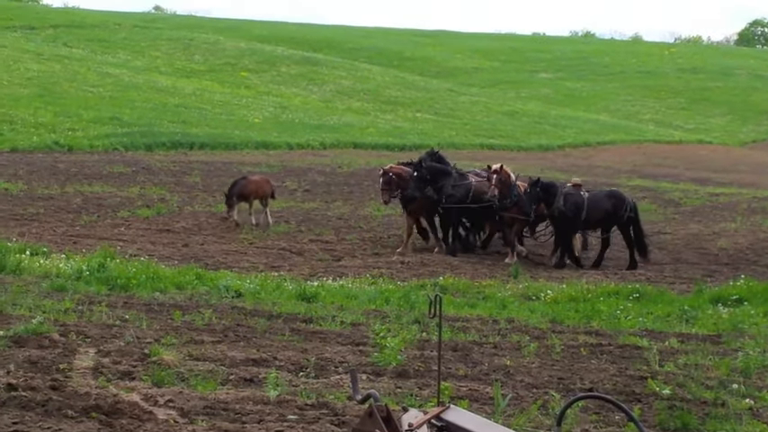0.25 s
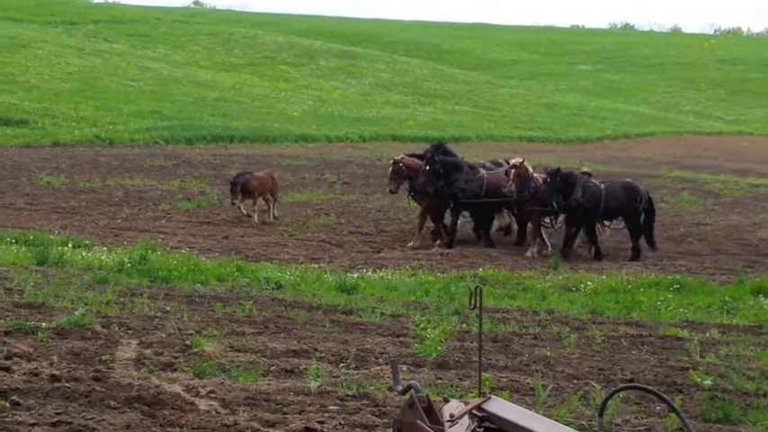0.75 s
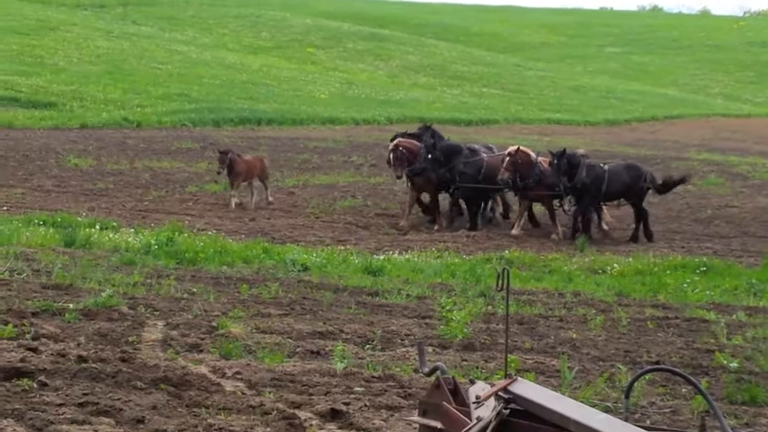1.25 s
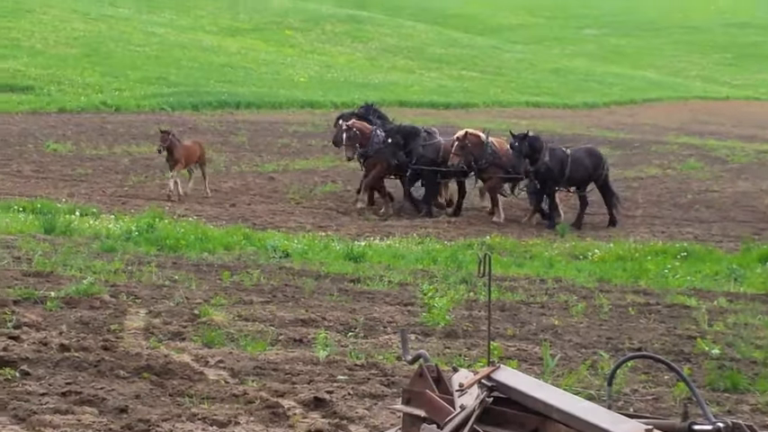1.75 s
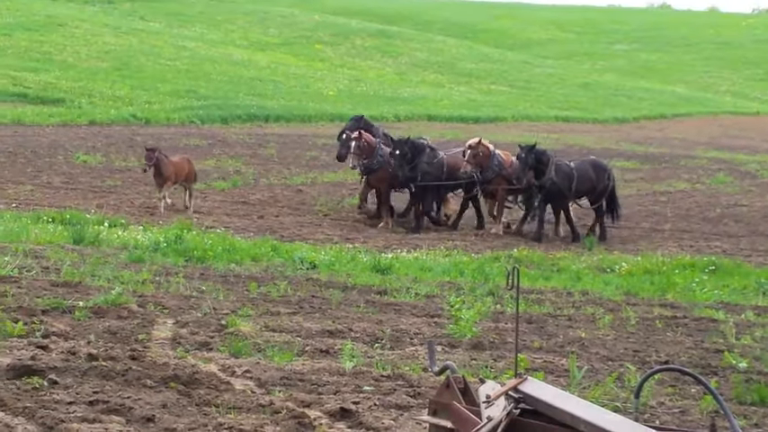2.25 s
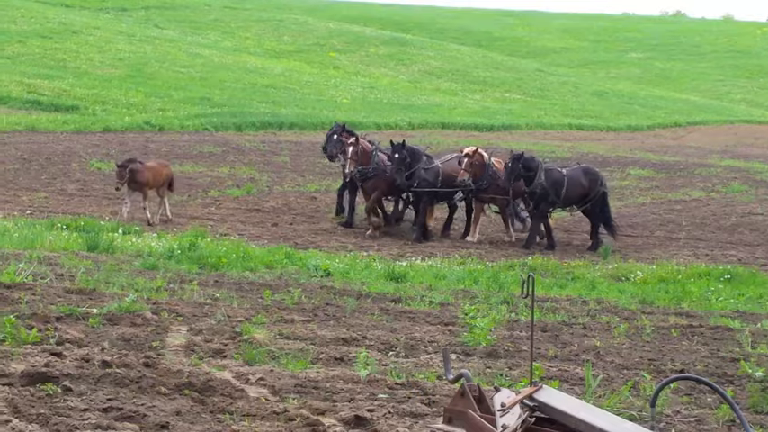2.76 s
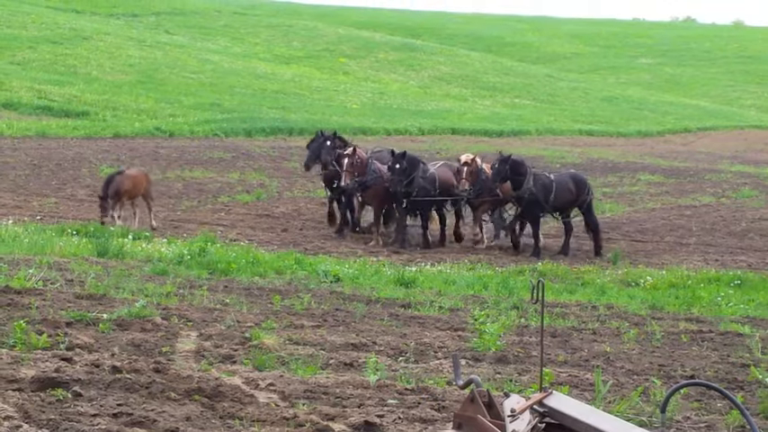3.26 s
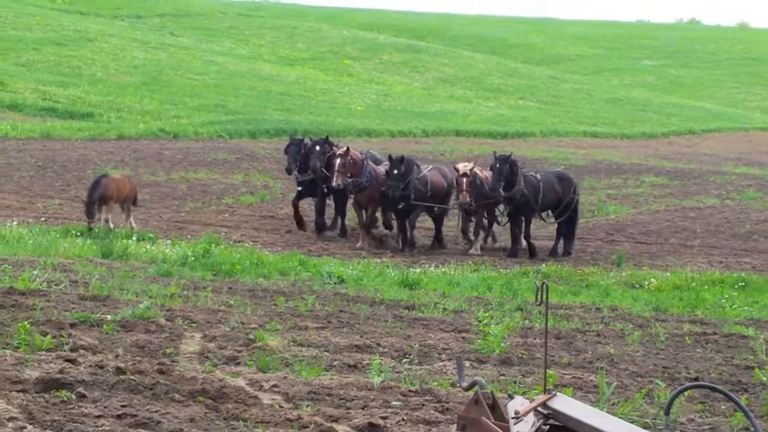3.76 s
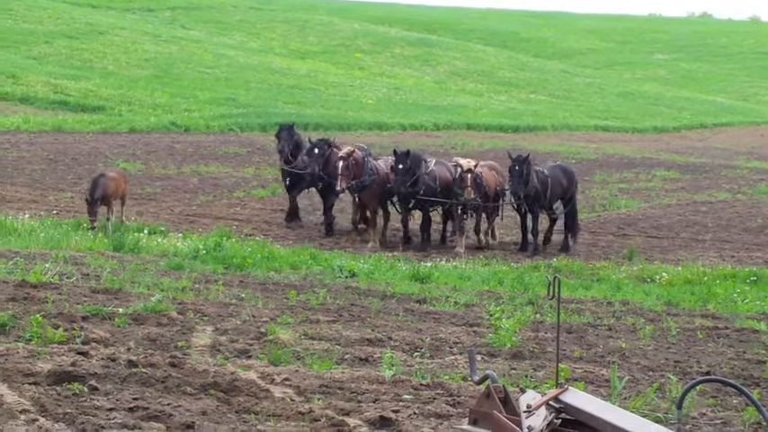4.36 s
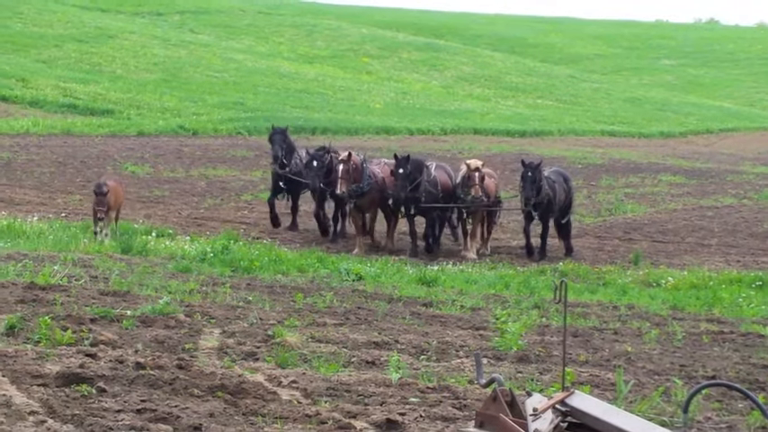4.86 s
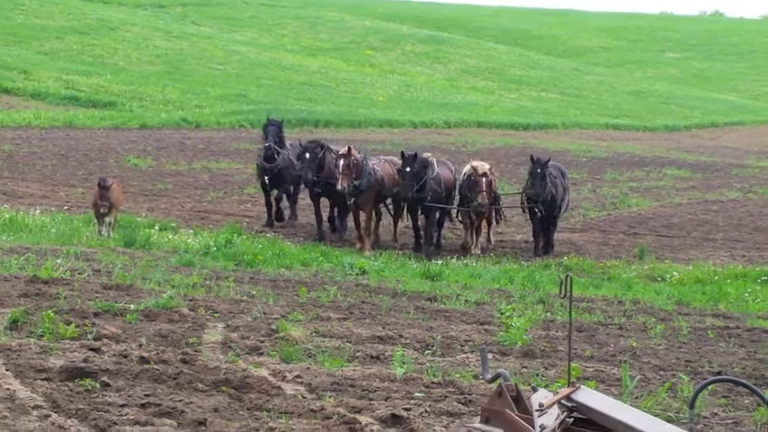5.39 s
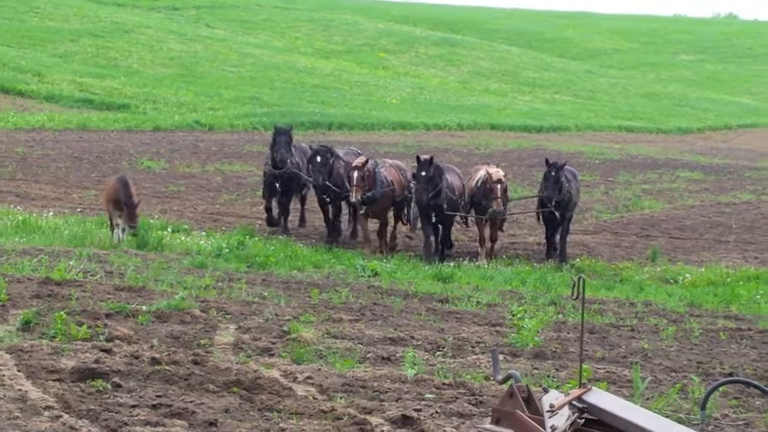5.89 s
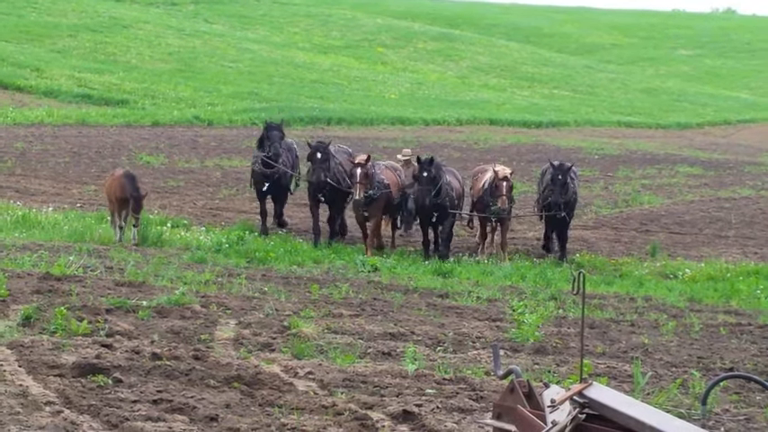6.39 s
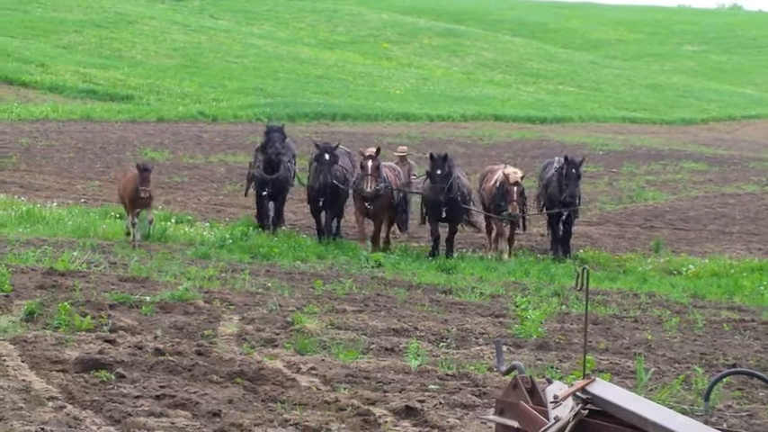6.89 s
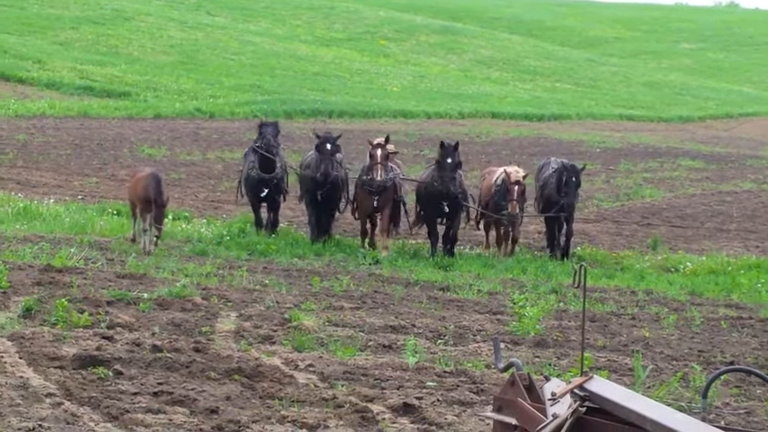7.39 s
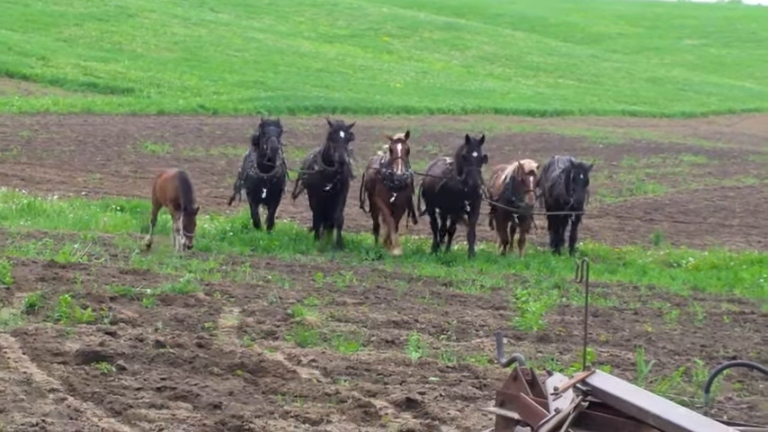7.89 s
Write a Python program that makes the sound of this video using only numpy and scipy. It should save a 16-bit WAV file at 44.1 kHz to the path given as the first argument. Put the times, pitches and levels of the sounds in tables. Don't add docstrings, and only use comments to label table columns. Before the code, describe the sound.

A team of harnessed horses comes nearer across tilled soil. Their chains start as a distant thin rustle, then rattle in uneven surges, with crisp ticks, tiny plinks and occasional muffled yoke or hoof knocks. Field birds whistle in the background over soft wind, slight hiss and wavering far engines. The last second is loudest, with a ringing iron clank; dry open-air sound, wide bright stereo.

```python
import sys
import numpy as np
from scipy import signal
from scipy.io import wavfile
from scipy.ndimage import uniform_filter1d

SR = 44100
rng = np.random.default_rng(int(sys.argv[2]) if len(sys.argv) > 2 else 0)


def boost(x):
    u = np.asarray(x, float) / 20
    return 10 ** u


def inscribe(sig):
    pcm = np.round(np.clip(np.atleast_2d(sig).T, -1, 1) * 32767)
    wavfile.write(sys.argv[1], SR, pcm.astype(np.int16))


N = 358885

# (t/s, level/dB)
NEAR = [
    (0.0, -74),
    (0.6, -100),
    (0.7, -67.5),
    (4.4, -70),
    (5.3, -57.5),
    (6.9, -56),
    (8.14, -53.5),
]
# (t/s, level/dB)
JOLTS = [(.69, -70), (1.0, -77), (1.28, -77), (1.53, -58), (1.7, -64), (1.97, -62.5), (2.42, -62),
         (2.74, -62), (3.12, -77), (3.4, -61), (3.76, -69), (4.14, -60.5), (4.5, -59.5), (4.8, -59.5),
         (4.96, -71), (5.16, -63), (5.48, -58), (5.74, -57), (5.88, -68), (6.05, -60.5), (6.4, -61),
         (6.6, -56.5), (6.79, -91), (7.02, -52), (7.401, -45.5), (7.722, -41.5), (7.86, -49.5),
         (7.97, -46.5)]
# (f/Hz, level/dB)
LINKS = [(5110, -10), (5560, -12), (9700, -11), (10000, -1), (10150, -5), (11000, -15)]
# (t/s, peak level of the tick/dB, level of the low
# knock/dB)
SNAPS = [(1.9686, -23.5, -50.5), (2.397, -39.5, -56), (2.696, -32.5, -53), (3.408, -37.5, -58),
         (4.103, -36.5, -60), (4.4804, -34, -49), (4.5425, -22.5, -49), (4.79, -25.5, -58),
         (5.159, -31, -67), (5.472, -32, -52), (5.4945, -29.5, -38.5), (5.7056, -35, -52),
         (5.778, -28, -48.5), (6.029, -26.5, -66), (6.3007, -31.5, -53), (6.3527, -23.5, -47),
         (6.6115, -22, -49.5), (6.648, -33.5, -64), (6.788, -29, -45), (6.9626, -32.5, -51),
         (7.2645, -22.5, -43.5), (7.5878, -30, -59), (7.928, -28, -39.5), (7.9373, -26.5, -41),
         (7.9945, -27, -36.5), (8.1294, -25, -71),
         (7.672, -30, -55),
    (7.7035, -25, -38),
]
# (t/s, peak level of the tick/dB)
TAPS = [(0.44, -48), (0.6654, -53), (0.716, -40), (0.837, -43.5), (1.443, -42), (1.5864, -41.5),
        (2.599, -43.5), (3.378, -46), (4.1757, -35.5), (4.45, -38), (4.743, -42), (5.3697, -36.5),
        (5.533, -38), (6.482, -36.5), (7.634, -34), (1.511, -42), (1.8652, -49), (2.1989, -50),
        (2.3743, -50), (2.4206, -56), (2.467, -40), (2.753, -41), (3.415, -42), (3.5068, -42),
        (4.114, -42.5), (4.295, -42), (4.431, -41.5), (4.5765, -42), (4.982, -39), (5.3853, -41),
        (5.5555, -36), (5.904, -36), (5.98, -43), (6.044, -41), (6.0815, -35.5), (6.4026, -38),
        (6.5772, -37), (6.6, -37.5), (6.7338, -43), (6.766, -34), (6.866, -38), (6.8969, -38), (7.035, -38),
        (7.3097, -37), (7.319, -37), (7.3902, -44), (7.421, -29), (7.4828, -32), (7.534, -32), (7.819, -32),
        (7.8246, -33), (7.8967, -33), (8.0478, -48), (4.798, -30.5), (4.886, -43), (5.72, -37),
        (5.865, -42), (1.781, -47), (1.88, -46), (7.23, -32)]
# (t/s, level of the low knock/dB)
THUDS = [
    (1.99, -45),
    (4.7596, -52.5),
    (5.816, -46),
    (7.104, -48.5),
    (7.71, -33),
    (7.232, -45.5),
    (7.875, -45),
    (8.083, -61),
]
# (t/s, length/s, f/Hz, level/dB)
CHIMES = [(0.618, 0.05, 8060, -55.5), (0.663, 0.035, 7840, -49), (.68, 0.076, 8310, -60),
          (0.729, 0.054, 7750, -59), (0.667, 0.024, 5420, -66), (1.59, .015, 6370, -56),
          (1.665, .03, 6360, -55.5), (1.66, 0.082, 4000, -63), (3.072, .08, 5540, -63),
          (3.8, .035, 8100, -56), (6.49, 0.045, 4990, -52), (6.69, .09, 5120, -58),
          (7.238, 0.035, 4320, -56), (7.282, 0.03, 4700, -53), (7.754, 0.02, 3190, -40.5),
          (7.752, .024, 7390, -46), (7.932, 0.037, 9200, -36.5), (7.973, 0.042, 5110, -50),
          (5.687, .1, 7050, -55), (6.04, 0.051, 3200, -55), (1.987, 0.031, 13260, -56),
          (1.99, 0.0024, 2600, -40), (2.426, 0.018, 5570, -54.5), (2.429, 0.11, 5070, -58),
          (2.692, 0.097, 7860, -50), (2.74, .02, 6200, -49), (3.151, 0.054, 9580, -56.5),
          (2.925, 0.024, 6900, -56), (3.376, 0.036, 8570, -49), (3.757, 0.02, 8460, -50.5),
          (4.75, 0.022, 6480, -55), (4.796, 0.083, 13300, -50), (5.864, 0.036, 7800, -45),
          (6.047, 0.02, 4790, -49), (6.256, 0.037, 5550, -46), (6.261, 0.045, 3890, -54),
          (6.487, 0.054, 9700, -44), (7.334, 0.28, 10140, -44), (7.369, 0.05, 5070, -47.5),
          (7.446, 0.2, 11040, -40.5), (7.395, 0.13, 9800, -42), (7.541, 0.053, 10470, -47),
          (7.55, 0.1, 5140, -54.5), (7.587, 0.05, 10820, -45.5), (7.84, 0.036, 11000, -54),
          (7.895, 0.018, 5560, -40), (7.997, 0.022, 13600, -45), (8.089, 0.02, 5070, -50),
          (7.7096, 0.00035, 2800, -13), (7.753, .009, 2550, -41), (7.738, 0.011, 1930, -32.5),
           (7.775, .04, 2550, -52), (7.035, .045, 1950, -47.5), (7.4, 0.044, 1950, -47),
           (6.752, 0.054, 2900, -51), (5.65, .06, 10150, -52.5), (5.28, .045, 7850, -60),
           (6.035, .05, 6000, -54), (6.255, 0.06, 10000, -52.5), (6.26, .05, 5100, -60),
           (1.715, .015, 7800, -58), (1.3, .03, 5500, -66), (1.845, .025, 5520, -62),
           (1.995, .03, 5120, -63), (8.3, .04, 6500, -50), (5.5, .06, 5560, -57), (7.035, .03, 8350, -50),
           (7.945, 0.055, 3500, -46), (5.38, .05, 6550, -53), (5.5, .04, 6650, -58),
           (5.477, .01, 6500, -49), (7.385, .015, 6800, -46), (5.895, 0.033, 10000, -59),
           (4.835, .085, 10000, -54)]
# (t/s, peak level/dB, f/Hz)
PLINKS = [(1.958, -51, 3970), (1.968, -47, 3500), (2.398, -47, 4520), (4.76, -49, 3140), (5.259, -49, 2400),
          (5.719, -46.5, 2330), (5.781, -44, 3240), (5.914, -45, 4880), (5.942, -53, 1900),
          (6.082, -44, 3960), (6.205, -49, 1750), (6.211, -51, 4200), (6.402, -51, 4500),
          (6.505, -46, 4100), (6.516, -45, 4230), (6.575, -47, 4100), (6.727, -51, 2410), (6.84, -48, 4100),
          (6.927, -44, 2340), (7.126, -43, 2500), (7.231, -43, 3170), (7.241, -47, 2300),
          (7.264, -36, 4220), (7.379, -47, 2990), (7.534, -44, 4170), (7.64, -46, 3200), (7.818, -40, 2960),
          (7.909, -40, 2000), (8.084, -47, 4170)]
# (t/s, length/s, level/dB)
LOOSE = [
    (1.863, 0.013, -50.5),
    (2.43, 0.1, -53.5),
    (4.623, 0.032, -51.5),
    (4.793, 0.028, -38.5),
    (6.136, 0.011, -48.5),
    (6.595, 0.042, -48.5),
    (7.04, 0.08, -45),
    (7.973, 0.053, -41.5),
    (8.085, 0.037, -41),
]
# (length/s, f/Hz, level/dB)
BUCKLE = [
    (0.085, 4418, -39),
    (.13, 4931, -52),
    (0.11, 5126, -43),
    (0.12, 9695, -44),
    (0.05, 10425, -51),
    (0.06, 12451, -47),
]
# (f/Hz, level/dB, time to fall 60 dB/s)
CLEVIS = [(1380, -19, .8), (1914, -11.5, .2), (1950, -19, .3), (2380, -13, .5), (2548, 1.5, .6),
          (2684, -15, .3), (3020, -19, .17), (3190, 1, .125), (3926, -15, .15), (4753, -27, .3),
          (5566, -27, .3), (6471, -31, .15), (7400, -15, .6), (8360, -26, .12)]
# (t/s, level/dB, time until gripped again/s, tilt/dB per octave)
CLANKS = [(1.502, -65.5, 0.039, -19), (4.098, -63, 0.011, -22), (4.544, -56.5, 0.11, -2),
          (5.475, -50.5, 0.011, -25), (5.49, -44.5, 0.014, -18), (5.711, -56.5, 0.039, -20.5),
          (6.765, -52.5, 0.029, -19), (6.983, -43.5, 0.026, -13.5), (7.032, -47.5, 0.032, -12),
          (7.393, -46.5, 0.045, -11), (7.709, -17.5, 0.038, 3), (7.877, -49.5, 0.059, -17),
          (7.927, -49, 0.049, -25.5), (7.98, -41, 0.03, -9)]

# (t/s, length/s, f/Hz, level/dB)
FLATS = [(0.211, 0.03, 1515, -71), (0.076, 0.028, 3350, -74), (0.487, 0.028, 1425, -74),
         (0.842, 0.078, 2075, -64), (1.294, 0.083, 2080, -66), (0.698, 0.064, 2100, -65),
         (.85, 0.031, 2850, -68.5), (1.438, 0.13, 2000, -68.5), (4.108, 0.06, 1963, -65),
         (4.519, 0.1, 1930, -65), (4.954, 0.052, 3260, -58)]
SWOOPS = [(.61, 0.0456, 2670, -76), (.75, 0.034, 2210, -67), (1.0, .055, 1600, -73),
          (1.36, 0.043, 2820, -67), (4.45, .09, 1700, -63), (5.04, 0.077, 2720, -67)]
DIVES = [(.105, .06, 2900, -72), (.705, .03, 2800, -66), (.8, .035, 2200, -70), (.94, .035, 2500, -69),
         (1.245, .042, 1790, -72), (1.89, .02, 2020, -65), (.915, .02, 1700, -69)]
HILLS = [(5.055, 0.21, 3106, -62)]
DROOPS = [(0.2, .075, 3320, -75), (.96, 0.062, 7800, -65), (1.026, 0.057, 7150, -67),
          (1.31, 0.042, 7250, -59.5)]
SAGS = [(1.19, 0.18, 7600, -58), (1.06, 0.052, 6180, -63), (1.345, 0.065, 6270, -62),
        (6.185, .085, 2285, -56), (6.335, 0.09, 2308, -55), (6.48, 0.09, 2317, -54)]
CHIPS = [(4.485, 0.04, 4200, -54), (4.575, .042, 4130, -53), (4.688, 0.045, 4250, -57),
         (4.905, 0.048, 4150, -57), (5.12, 0.06, 4300, -55), (5.33, .045, 4100, -58)]
ARCHES = [(1.635, .08, 3020, -66), (1.735, .07, 3200, -61), (1.85, .06, 2850, -65), (.84, .05, 2900, -68),
          (2.04, .06, 3200, -70)]
# (delay t/s, length/s, start f/Hz, middle f/Hz, end f/Hz, level/dB)
PIPE = [
    (0, .05, 3410, 4140, 4240, -3),
    (0.1, .036, 3585, 4160, 4700, -1),
    (0.209, .073, 4860, 4900, 4895, -7.5),
    (.268, .059, 4935, 4240, 3805, 0),
]
SLUR = [
    (0, .067, 1490, 1670, 1930, -13.5),
    (.055, 0.028, 2470, 2955, 3200, -0.5),
]
# (t/s, level/dB)
PIPES = [(2.985, -65), (3.485, -55), (3.98, -54.5)]
SLURS = [(.26, -66), (.62, -59.5), (1.001, -63.5)]
# (delay t/s, length/s, start f/Hz, middle f/Hz, end f/Hz, level/dB)
FALLING = [
    (0, .06, 6600, 6000, 5750, -56),
    (.05, .035, 7600, 6800, 5600, -54),
    (.075, .055, 5000, 4800, 4100, -57),
]
RISING = [
    (0, .035, 4000, 4500, 5000, -58),
    (.035, .06, 5600, 6500, 7300, -52),
]
FALLING_S = [4.895, 5.095, 5.295]
RISING_S = [5.505, 5.645, 5.775]

# (t/s, level/dB)
DRONE = [(0, -78), (.4, -66.5), (.85, -69.5), (1.6, -57), (2.8, -59.5), (3.1, -63.5), (3.7, -58.5),
         (4.15, -69), (4.55, -64.5), (5.0, -52), (5.4, -49.5), (6.5, -54.5), (7.0, -63.5), (7.4, -53.5),
         (8.14, -55.5)]
DOUBLE_S = [.1, .8, 1.85, 3.5, 4.1, 4.5, 5.3, 5.8, 6.2, 7.07, 7.8]
TRIPLE_S = [.42, 1.15, 2.03, 2.5, 2.72, 3.25, 3.95, 4.65, 5.9, 6.7, 7.05, 7.75]
FOURTH_S = [1.45, 1.75, 2.75, 3.72, 4.15, 5.9, 6.25, 6.75, 7.9]
# (t/s, level/dB)
AIR_DB = [
    (0.0, -68.5),
    (0.04, -72.5),
    (8.14, -62),
]
# (f/Hz, level/dB per Hz)
AIR = [(20, -10), (45, -1), (100, 7.5), (160, 9), (300, 5), (520, 0), (700, 5), (1150, -0.5), (2600, -3),
       (5000, -17.5), (12000, -18.5)]
# (f/Hz, likeness from 0 to 1)
SAME = [(60, 1), (130, 0.7), (290, 0.86), (640, 0.32), (1400, 0), (5000, 0.78)]
# (f/Hz, left level/dB, right level/dB)
PORTS = [(60, -2.5, 1), (1270, -5, -1.5), (2600, -2.5, 4), (3550, -0.5, 6), (4860, 3.5, 8),
         (5700, 13.5, -4.5), (6480, 12.5, 14.5), (7020, -23, 17.5), (7440, 12, 21), (7960, -10, 21.5),
         (9700, -12, 12.5), (11500, 1.5, 3), (13500, -43, 7.5), (14800, -27, 7)]


def rattle():
    motion_db = shake()
    treble = grains(motion_db - 11, 4320, 13980, per_s=6000, spread_db=3.2, t60=0.0072)
    clatter = grains(motion_db - 7, 1347, 4625, per_s=2500, spread_db=3.6, t60=0.024)
    faint = np.zeros(N)
    for at, which, size, length in rng.random((500, 4)):
        hz, db = LINKS[int(which * len(LINKS))]
        level_db = motion_db[int(at * N)] + db - 11 + 10 * size
        tone = ring(hz * (1 + .008 * length), .008 + .03 * length, .2)
        add(faint, at * N / SR, at_source(level_db, hz) * tone)
    return treble + clatter + scatter(faint, .12, 3)


def shake():
    rise_s, fall_s = 0.032, 0.078
    t = np.arange(0, N, 64) / SR
    surges = np.zeros(len(t))
    for s, db in JOLTS:
        surges += boost(db) * np.exp(np.minimum((t - s) / rise_s, (s - t) / fall_s))
    return 20 * np.log10(boost(curves(NEAR)[0]) + np.interp(np.arange(N) / SR, t, surges))


def grains(db, lo_hz, hi_hz, per_s, spread_db, t60):
    strikes = rng.random(N) < per_s / SR
    size = boost(spread_db * np.minimum(rng.exponential(1, (2, N)), 4)) * strikes
    kind = rng.integers(0, 12, N)
    t = np.arange(1500) / SR
    out = np.zeros((2, N))
    for k, hz in enumerate(np.geomspace(lo_hz, hi_hz, 12)):
        phase = np.array([[0], [k]])
        knock = boost(-60 * t / t60) * np.sin(2 * np.pi * hz * t + phase)
        out += signal.oaconvolve(size * (kind == k), knock, axes=1)[:, :N]
    return boost(db) * evened(out)


def knocks():
    snaps, rings = np.zeros(N), np.zeros(N)
    t = np.arange(500) / SR
    taps = [(s, db, db - 17) for s, db in TAPS]
    thuds = [(s, db + 8, db) for s, db in THUDS]
    for s, db, low_db in SNAPS + taps + thuds:
        first, second, pitch, size = rng.random(4)
        band = signal.butter(2, np.multiply([5800, 8000], 1 + .22 * size), "bandpass", fs=SR)
        snap = signal.lfilter(*band, rng.standard_normal(500) * boost(-60 * t / 0.0072))
        for delay, bounce_db in [(0, 0), (.0012 + .001 * first, -3), (.003 + .004 * second, -10)]:
            add(snaps, s + delay, boost(db - 15 + bounce_db) * snap / abs(snap).max())
        knock = boost(low_db + 8 - 60 * t / .015) * np.minimum(t / .001, 1)
        knock *= np.sin(2 * np.pi * (1900 + 800 * pitch) * t)
        rough = evened(uniform_filter1d(rng.standard_normal(500), size=16))
        add(snaps, s, knock * (1 + 0.6 * rough))

    plinks = [(s, .002, hz, db) for s, db, hz in PLINKS]
    loose = [(s, length, 9985, db) for s, length, db in LOOSE]
    buckle = [(7.104, *mode) for mode in BUCKLE]
    for s, length, hz, db in CHIMES + plinks + loose + buckle:
        add(rings, s, at_source(db, hz) * ring(hz, length, 0.44))
    return scatter(snaps, 0.18, -6) + scatter(rings, 0.11, -5)


def ring(hz, length, t60, grip_s=0.001, uneven=0.41):
    t = np.arange(round((length + .02) * SR)) / SR
    held = np.exp(-np.maximum(t - length, 0) / grip_s) * np.minimum(t / 0.0007, 1)
    start, beat, split = rng.random(3)
    brush = np.interp(t, t[::128], rng.standard_normal(len(t[::128])))
    beating = 1 + uneven * (np.sin(2 * np.pi * (.004 * hz * split * t + beat)) + brush)
    return held * beating * boost(-60 * t / t60) * np.sin(2 * np.pi * (hz * t + start))


def clevis():
    swing_hz, swing_late_s = 2548, .0045
    out = np.zeros(N)
    band = signal.butter(2, [1200, 4500], "bandpass", fs=SR)
    for s, db, length, tilt_db in CLANKS:
        for hz, mode_db, t60 in CLEVIS:
            late_s = swing_late_s if hz == swing_hz else 0
            level_db = db + mode_db + tilt_db * np.log2(hz / 2500)
            if db < -30:
                level_db += rng.normal(0, 2.5)
            if hz == swing_hz and db < -44:
                level_db -= 9
            tone = ring(hz, length - late_s, t60, grip_s=0.002, uneven=.12)
            add(out, s + late_s, at_source(level_db, hz) * tone)
        fade = boost(db - 14 - 60 * np.arange(1800) / SR / 0.39)
        add(out, s + 0.001685, fade * signal.lfilter(*band, rng.standard_normal(1800)))
    return scatter(out, .1, -18)


def birds():
    warbles = shaped(FLATS, (.94, 1, .96)) + shaped(SWOOPS, (.8, 1, 1.08))
    warbles += shaped(DIVES, (1.25, 1, .74)) + shaped(HILLS, (.73, 1, .73))
    songs = shaped(DROOPS, (1.02, .97, .88)) + shaped(SAGS, (1.07, .99, .98))
    songs += shaped(CHIPS, (.9, 1, 1.02)) + shaped(ARCHES, (.93, 1, .82))
    songs += repeated(PIPES, PIPE) + repeated(SLURS, SLUR)
    high = repeated([(s, 0) for s in FALLING_S], FALLING) + repeated([(s, 0) for s in RISING_S], RISING)
    song = scatter(whistle(songs, flutter=.3, quaver=.004), .4, -5)
    warble = scatter(whistle(warbles, flutter=.35, quaver=.008), .3, -4)
    high_song = scatter(whistle(high, flutter=.5, quaver=.008), .4, 3)
    return song + warble + high_song


def shaped(rows, shape):
    return [(s, length, *np.multiply(hz, shape), db) for s, length, hz, db in rows]


def repeated(calls, phrase):
    return [(s + delay, *note, db + note_db) for s, db in calls for delay, *note, note_db in phrase]


def whistle(notes, flutter, quaver):
    out = np.zeros(N)
    for s, length, *hz, db in notes:
        u = np.linspace(0, 1, round(length * SR))
        glide = np.polyval(np.polyfit([0, .5, 1], hz, 2), u)
        pitch = glide * (1 + quaver * evened(uniform_filter1d(rng.standard_normal(len(u)), size=150)))
        tone = signal.windows.tukey(len(u), .6) * np.sin(2 * np.pi * np.cumsum(pitch) / SR)
        add(out, s, at_source(db + 2.5, hz[1]) * tone)
    return out * (1 + flutter * evened(uniform_filter1d(rng.standard_normal(N), 200)))


def engines():
    first_hz, second_hz = 91.5, 109.4
    second_db = curves(AIR_DB)[0] + 6 + 0.2 * wander(1.5)
    tones = [(first_hz, curves(DRONE)[0]),
             (second_hz, second_db),
             (2 * first_hz, throb(DOUBLE_S, db=-67, width_s=.17, low_db=-15)),
             (3 * first_hz, throb(TRIPLE_S, db=-72, width_s=.15, low_db=-12)),
             (second_hz / 2, second_db - 9),
             (4 * first_hz, throb(FOURTH_S, db=-74.5, width_s=.1, low_db=-10.5))]
    t = np.arange(N) / SR - np.array([[0], [.00035]])
    out = np.zeros((2, N))
    for hz, db in tones:
        level_db = db + 4 + 0.9 * wander(3.0) + 1.6 * wander(7.8)
        phase = 1.16 * wander(1.0) + 0.31 * wander(5.0)
        out += boost(level_db) * np.sin(2 * np.pi * hz * t + phase)
    return out


def throb(times, db, width_s, low_db):
    t = np.arange(N) / SR
    swells = sum(np.exp(-((t - s) / width_s) ** 2) for s in times)
    return db + 20 * np.log10(boost(low_db) + swells)


def air():
    frames, hz = N // 256 + 5, np.fft.rfftfreq(1024, 1 / SR)
    a, b, c, d, patches = rng.standard_normal((frames, 513, 5)).T
    patches = evened(uniform_filter1d(uniform_filter1d(patches, 10, 0), 14, 1))
    same = np.clip(read(SAME, hz), -1, 1)[:, None]
    left, other = a + 1j * b, c + 1j * d
    spectra = np.array([left, same * left + np.sqrt(1 - same ** 2) * other])
    spectra *= boost(read(AIR, hz)[:, None] + 2.4 * patches)
    noise = signal.istft(spectra, nperseg=1024, noverlap=768)[1][:, :N]
    return boost(curves(AIR_DB)[0] + 6) * evened(noise)


def scatter(x, t60, db):
    t = np.arange(SR // 2) / SR
    tail = rng.standard_normal((2, len(t))) * boost(-60 * t / t60) * (t > .002)
    tail /= np.linalg.norm(tail[0])
    return x + boost(db) * signal.fftconvolve(x * np.ones((2, 1)), tail, axes=1)[:, :N]


def wander(rate):
    t = np.arange(0, N, 256) / SR
    slow = sum(np.sin(2 * np.pi * (f * t + rng.random())) for f in np.geomspace(rate / 10, rate, 12))
    return np.interp(np.arange(N) / SR, t, evened(slow))


def at_source(db, hz):
    left, right = boost(read(PORTS, hz, column=1)), boost(read(PORTS, hz, column=2))
    return boost(db) / np.sqrt((left ** 2 + right ** 2) / 2)


def evened(x):
    return x / np.sqrt(np.mean(x ** 2) + 1e-20)


def read(points, hz, column=1):
    table = np.transpose(points)
    return np.interp(np.log(hz + 1), np.log(table[0] + 1), table[column])


def curves(rows):
    s, *columns = np.transpose(rows)
    return [np.interp(np.arange(N) / SR, s, c) for c in columns]


def add(mix, s, sound):
    part = mix[round(s * SR):][:len(sound)]
    part += sound[:len(part)]


def scene():
    return rattle() + knocks() + clevis() + birds() + engines() + air()


def roll_off(x):
    return signal.sosfilt(signal.butter(12, 15550, fs=SR, output="sos"), x)


def record(dry):
    hz = abs(np.fft.fftfreq(4096, 1 / SR))
    log_gain = np.log(boost(np.array([read(PORTS, hz, column=1), read(PORTS, hz, column=2)])))
    taps = np.fft.ifft(np.exp(np.conj(signal.hilbert(log_gain)))).real[:, :1024]
    hiss = boost(curves(AIR_DB)[0]) * rng.standard_normal((2, N))
    heard = signal.oaconvolve(dry, taps, axes=1)[:, :N] + hiss
    limited = signal.oaconvolve(heard, signal.firwin(255, 15200, fs=SR)[None], "same")
    return roll_off(limited)


dry = scene()
out = record(dry)
inscribe(out)
```